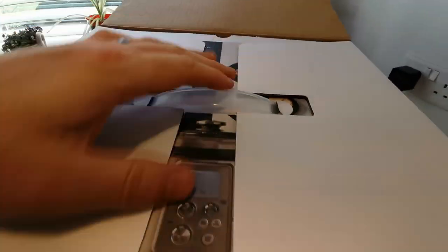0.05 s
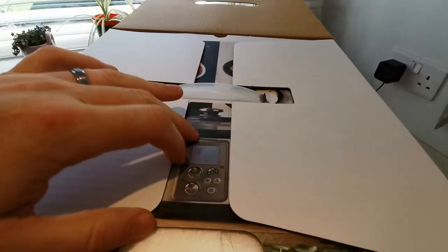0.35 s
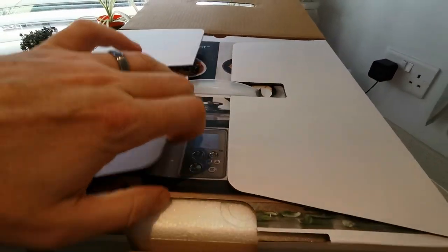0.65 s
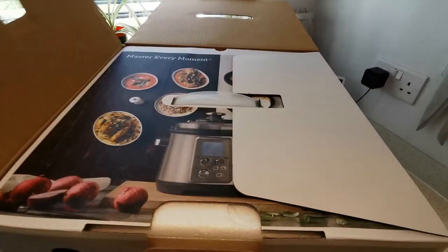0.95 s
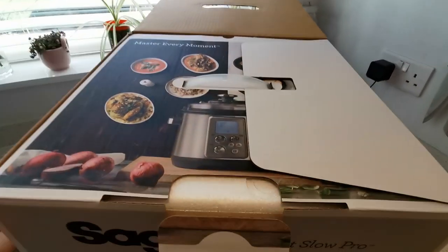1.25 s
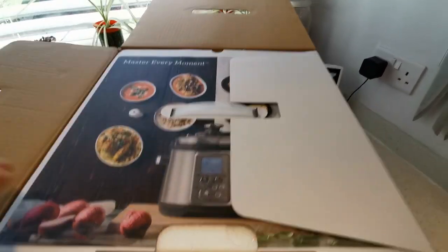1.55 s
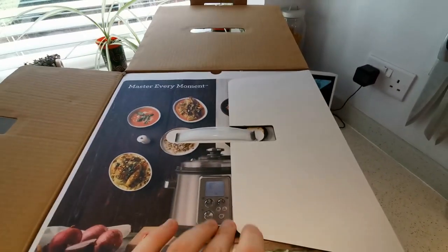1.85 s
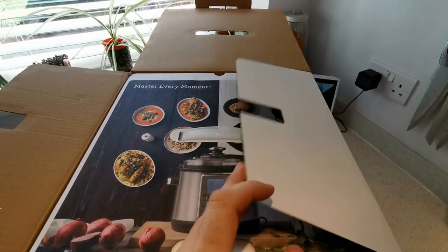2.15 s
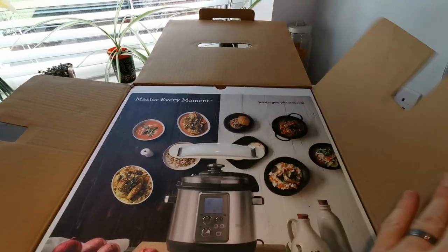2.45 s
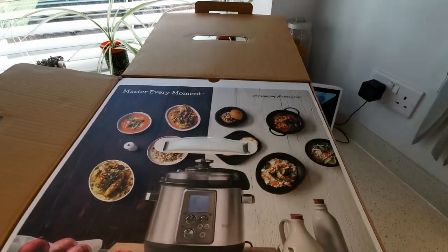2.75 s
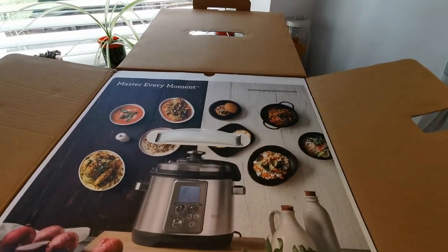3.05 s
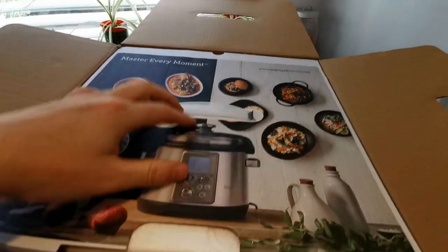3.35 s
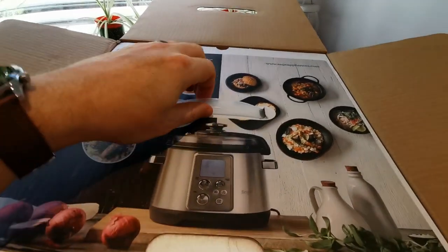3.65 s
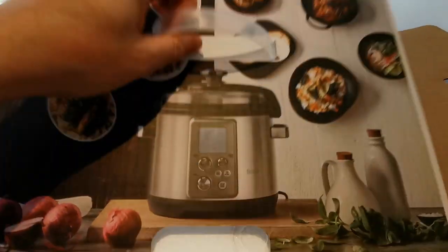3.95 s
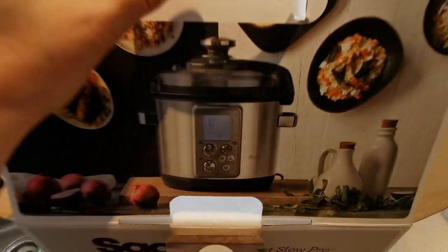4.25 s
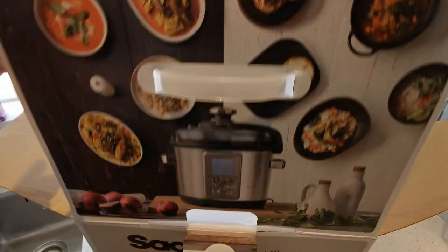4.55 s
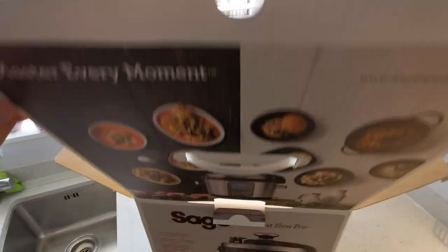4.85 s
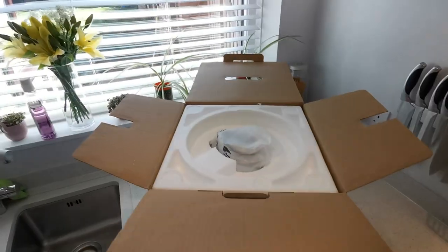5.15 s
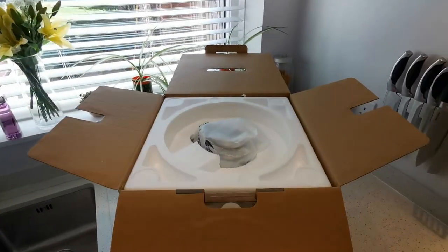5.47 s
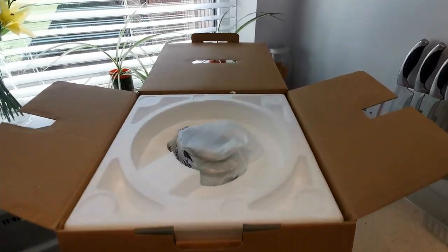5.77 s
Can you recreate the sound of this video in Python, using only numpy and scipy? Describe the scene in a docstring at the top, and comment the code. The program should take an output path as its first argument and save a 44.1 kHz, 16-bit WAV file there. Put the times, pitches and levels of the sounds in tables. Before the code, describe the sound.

A large cardboard box is opened close to the microphone in a small kitchen. A brush of a hand and a cluster of hollow knocks start it off, then hands hiss over the card while flaps scrape and snap. More knocks lead to a short groan as the tight lid slips free, followed by a loud thump and a puff of air. Finally the lid swishes down and lands. An appliance hums faintly.

```python
"""A brush of a hand, then a cluster of hollow knocks: a large cardboard box is being opened.
It stands on a kitchen worktop, close to a handheld stereo microphone. Hands hiss over the card,
flaps snap and scrape, and the tight lid sticks and slips free with a groan, fanning air at the
microphone. At the end the lid swishes down and lands. The small room answers; an appliance hums."""
import sys
import numpy as np
from scipy import signal
from scipy.fft import rfft, irfft, next_fast_len
from scipy.io import wavfile
from scipy.ndimage import uniform_filter1d, map_coordinates

SR = 44100
rng = np.random.default_rng(int(sys.argv[2]) if len(sys.argv) > 2 else 0)


def store_wav(level_fs):
    """Save 16-bit WAV to argv[1]."""
    pcm = np.round(np.clip(np.atleast_2d(level_fs), -1, 1) * 32767)
    wavfile.write(sys.argv[1], SR, pcm.T.astype(np.int16))


N = 265041

# Levels are relative within a table; a positive balance leans left.
# appliance hum: f/Hz, level/dB
HUM_PARTIALS = [(61.7, -48.5), (123.4, -75), (246.8, -69)]
# noise of the quiet kitchen: f/Hz, level/dB
ROOM_TONE = [(20, -4), (45, 9), (90, -7.5), (160, -1), (260, -7), (600, -21.5), (2000, -24.5), (4000, -33),
             (11000, -31.5), (16000, -52)]
# reverberation of the kitchen: f/Hz, t60/s
ROOM_DECAY = [(100, 0.039), (300, 0.44), (1000, 0.25), (3000, 0.27), (8000, 0.3), (16000, 0.15)]
# likeness of the sound at the microphone's two ports: f/Hz, correlation
PORT_LIKENESS = [(100, 0.87), (300, 0.92), (700, 0.49), (1500, 0), (4000, 0)]
# unequal sensitivity of the ports: f/Hz, balance/dB
PORT_BALANCE = [(100, -3.5), (400, 2.5), (750, 3.5), (1300, -4), (2600, 3), (4500, 0), (6000, -2.5),
                (7200, -15), (8600, 20.5), (10500, 15.5), (13500, 10), (16000, 13.5)]
# air fanned by the lid: peak t/s, level/dB, half length/s
AIR_PUFFS = [(4.133, -47.5, 0.2), (4.461, -28.5, 0.033), (4.721, -44, 0.04), (5.66, -54.5, 0.06),
             (5.986, -50, 0.11)]
# resonances that the card lends to scrapes and cracks: f/Hz, width/Hz, gain/dB
CARD_RESONANCES = [(254, 19, -2.5), (385, 29, 5.5), (710, 33, -0.5), (862, 26, -4), (973, 17.65, -4.5),
                   (1348, 35, -2.5), (1720, 47, 1.5), (1990, 39, 3), (2220, 68, 3.5), (2560, 270, 2.5),
                   (2930, 120, 2.5), (4190, 250, -0.5)]
# spectra of rubbed and struck card: f/Hz, level/dB
PANEL_RUMBLE = [(70, -23.5), (160, -6.5), (250, 1.5), (340, -5), (500, -8), (760, -1.5), (1000, -11),
                (1600, -31.5)]
FIBRE_RASP = [(500, -8.5), (1000, -2), (1400, 1), (2200, -0.5), (3300, -8.5), (4800, -3.5), (7000, -20),
              (12000, -47)]
HAND_HISS = [(2500, -18), (5000, -6.5), (6900, 3), (7800, -2.5), (9000, 2), (10800, 3), (13000, -3),
             (14200, -5), (15800, 0)]
SKIN_SIZZLE = [(5000, -48.5), (8000, -25), (10500, 2.5), (12500, 3), (14000, 7.5), (15800, -2)]
LID_SWISH = [(150, -3.5), (600, -1.5), (950, -5.5), (1500, -3), (3000, -5.5), (7000, -1.5), (11000, 2.5),
             (16000, 0)]
EDGE_SNAP = [(500, -20.5), (3000, -23), (5000, -6.5), (7000, 1.5), (10000, 0.5), (13000, -3),
             (16000, -15.5)]
CONTACT_CRACK = [(500, -33), (1200, 4), (2100, 3.5), (3200, -5.5), (4800, -2), (7000, -7.5), (11000, -12.5),
                 (16000, -41)]
# a hand glides over the print: t/s, length/s, level/dB, sizzle against hiss/dB, balance/dB
HAND_STROKES = [(-0.02, 0.025, -40.5, -6.5, 4.5), (0.16, 0.23, -43, -5, 7.5), (0.454, 0.069, -45.5, -6, 7),
                (0.67, 0.06, -48.5, -16.5, -1), (0.843, 0.23, -50, -7.5, 0.5),
                (1.106, 0.09, -41.5, 1, -0.5), (1.204, 0.18, -47.5, -8, 1), (1.28, 0.089, -45.5, 0, 0),
                (1.436, 0.1, -44.5, -5.5, 1), (1.794, 0.089, -56.5, -6, -5), (1.947, 0.2, -57, -10, -6),
                (2.217, 0.07, -48.5, -19, -5), (2.332, 0.09, -60, -20, -6), (2.413, 0.13, -45, -3, -1),
                (2.564, 0.092, -48.5, -3, -6), (2.642, 0.047, -44, 5.5, -12),
                (2.684, 0.14, -42, -3.5, -7.5), (2.766, 0.17, -39, -11.5, -6.5),
                (2.928, 0.033, -36.5, -13.5, -6), (3.331, 0.08, -49, -6.5, -1), (3.404, 0.26, -44, 2, -1.5),
                (4.042, 0.14, -50.5, -3, 3.5), (4.23, 0.46, -51, -3.5, 2.5), (4.528, 0.029, -41.5, 0, 0.5),
                (4.605, 0.055, -43, -6.5, 1.5), (4.739, 0.23, -48.5, -14, -1),
                (5.432, 0.07, -43.5, 4.5, -1)]
# card drags along card: t/s, length/s, rasp/dB, rumble/dB
CARD_SCRAPES = [(0.148, 0.048, -39, -38), (0.23, 0.13, -50, -50.5), (0.373, 0.032, -45.5, -44.5),
                (0.474, 0.058, -48.5, -51.5), (0.574, 0.43, -54.5, -54.5), (0.72, 0.14, -46.5, -59),
                (0.873, 0.19, -66.5, -59.5), (1.317, 0.072, -56.5, -55), (1.497, 0.037, -52, -82),
                (1.795, 0.17, -65, -60), (2.085, 0.2, -61.5, -59.5), (2.33, 0.1, -69.5, -61),
                (2.457, 0.051, -51, -51.5), (2.794, 0.12, -61, -61), (3.42, 0.12, -61, -48.5),
                (3.605, 0.26, -54.5, -44), (3.825, 0.08, -47, -40), (3.896, 0.029, -35, -58),
                (3.983, 0.1, -56.5, -42), (4.277, 0.027, -46, -48), (4.388, 0.055, -54.5, -41),
                (4.438, 0.039, -33, -30.5), (4.53, 0.1, -51.5, -53), (4.709, 0.055, -52.5, -52),
                (4.785, 0.27, -59, -65), (5.073, 0.11, -59.5, -54.5), (5.173, 0.2, -68.5, -66.5),
                (5.425, 0.07, -68, -57.5), (5.53, 0.2, -72.5, -59), (5.75, 0.32, -69, -55.5),
                (5.919, 0.011, -40, -41.5)]
# the lid slides down: t/s, level/dB, resonance f/Hz
LID_SLIDE = [(5.671, -55.5, 2360), (5.686, -33, 2590), (5.74, -33.5, 2840), (5.79, -36.5, 2360),
             (5.84, -40, 1575), (5.88, -43, 1360), (5.92, -47, 1220)]
# the tight lid slips: t/s, level/dB, slip rate/Hz
LID_JUDDER = [(3.88, -53, 354), (3.905, -32, 418), (3.93, -30, 387), (3.942, -19, 394), (3.952, -23, 417),
              (3.97, -43, 410), (3.99, -70, 360)]
# card edges snap past each other, and at 1.802 and 5.439 s a fingertip lands on the card: t/s, level/dB,
# balance/dB before a common lean to the right
FLAP_FLICKS = [(0.1763, -20, -1), (0.769, -44, 12.5), (0.8509, -19.5, 7), (1.658, -56.5, -24),
               (1.802, -56, -1), (2.4935, -23, 1), (2.655, -47, 1), (2.972, -35, -8), (3.341, -45, 3),
               (3.6, -40.5, 17), (3.695, -43, 5), (3.768, -49, -3.5), (3.9039, -28.5, 13), (3.932, -26, 7),
               (4.146, -49, 17), (4.4661, -20, -2.5), (4.556, -37, 15), (4.716, -42.5, 3),
               (4.8128, -39, 1.5), (5.167, -51, -4), (5.439, -51, 0), (5.926, -34.5, -2.5),
               (5.947, -31, -12)]
# modes of the box, from deep thud to panels, and of the air inside: f/Hz, level/dB, t60/s
THUD_MODES = [(80.8, -12.5, 0.051), (117.3, 9, 0.14), (153.6, 10, 0.13)]
BODY_MODES = [(185, -6, 0.067), (232.6, -5.5, 0.11), (289.3, -3, 0.099), (334.3, -3, 0.099),
              (407.4, -5, 0.11)]
PANEL_MODES = [(528, -4, 0.036), (699, -3, 0.07), (761.4, 0.5, 0.086), (854, 0, 0.093), (941, -6, 0.12),
               (1032, -4.5, 0.064)]
CAVITY_MODES = [(247.8, 0, 0.33)]
# blows on the box, and at 3.904, 3.918 and 3.931 s the stick-slip jolts of the tight lid: t/s, strength/dB,
# hardness of the contact/dB, weight behind it/dB
BOX_BLOWS = [(0.129, -28.5, -16.5, -8), (0.139, -33, -11, -18), (0.148, -31.5, -8.5, -11),
             (0.175, -21.5, -2, -14), (0.327, -54, 9, -10), (0.512, -53.5, 3, 2), (0.665, -49.5, -7.5, -17),
             (0.851, -52, 8.5, 5), (1.169, -61, 5.5, -7), (1.36, -51, -10.5, -4), (1.846, -47, -18, -4.5),
             (1.876, -50, -9, -16), (2.246, -53, -6.5, -0.5), (2.492, -58.5, 11, -6.5),
             (3.3395, -33, -17.5, -3), (3.432, -35, -11, -4), (3.456, -35.5, -33, -18),
             (3.494, -33.5, -13, -3.5), (3.506, -38.5, -7, -12), (3.583, -40, -3, -9.5),
             (3.5998, -21.5, -7.5, -15.5), (3.697, -20, -14, -8), (3.766, -35, -1, -17),
             (3.819, -43, -3, -18), (3.904, -45.5, 14.5, -10), (3.918, -40, 10, 2),
             (3.931, -39.5, 7.5, 10.5), (4.024, -42, -1.5, 15.5), (4.04, -46, 11.5, 4),
             (4.128, -44.5, -4.5, -14), (4.146, -60.5, 8.5, -13), (4.448, -37.5, 1.5, -2),
             (4.468, -16, -6.5, -5.5), (4.716, -44.5, -10, -4), (5.073, -38, -12, -26),
             (5.092, -43, -8, -33), (5.926, -36, 3.5, -11), (5.947, -43.5, 0.5, -15)]


def amp(db):
    return 10 ** (np.asarray(db) / 20)


def unit(x):
    return x / np.sqrt(np.mean(x ** 2) + 1e-20)


def burst(x, seconds):
    """Scale a short sound to rms 1, its energy counted over so many seconds."""
    return x / np.sqrt(np.mean(np.sum(x ** 2, axis=-1)) / (seconds * SR))


def along(points, hz):
    """Interpolate (f/Hz, value) points on a log frequency axis."""
    point_hz, values = np.transpose(points)
    return np.interp(np.log(hz + 1), np.log(point_hz + 1), values)


def curves(rows):
    """One value per sample for each column after the time."""
    times, *columns = np.transpose(rows)
    return [np.interp(np.arange(N) / SR, times, column) for column in columns]


def during(rows):
    """1 from the first row's time to the last, else 0."""
    t = np.arange(N) / SR
    return (t > rows[0][0]) & (t < rows[-1][0])


def wobble(rate):
    """A smooth random curve, rate knots a second."""
    return map_coordinates(rng.standard_normal(int(N * rate / SR) + 4), [np.arange(N) * rate / SR])


def pan(db):
    """Left and right gains of constant power."""
    gains = amp([np.atleast_1d(db) / 2, -np.atleast_1d(db) / 2])
    return gains / np.sqrt(np.mean(gains ** 2, axis=0))


def filtered(x, response):
    """Weight the spectrum of x by a function of frequency."""
    n = x.shape[-1]
    size = next_fast_len(n + SR // 10)
    return irfft(rfft(x, size) * response(np.fft.rfftfreq(size, 1 / SR)), size)[..., :n]


def coloured(x, spectrum, size=2048):
    """Minimum-phase colour: nothing sounds before its cause."""
    cepstrum = irfft(np.log(amp(along(spectrum, np.fft.rfftfreq(size, 1 / SR)))))
    cepstrum[1:size // 2] *= 2
    cepstrum[size // 2 + 1:] = 0
    impulse = irfft(np.exp(rfft(cepstrum)))
    return signal.fftconvolve(x, impulse[None], axes=1)[:, :x.shape[-1]]


def spread(pair):
    """Two unrelated signals become left and right, alike in the bass."""
    turn = lambda hz: np.arccos(np.clip(along(PORT_LIKENESS, hz), -1, 1)) / 2
    mid, side = filtered(pair, lambda hz: np.array([np.cos(turn(hz)), np.sin(turn(hz))]))
    return np.array([mid + side, mid - side])


def noise(n):
    return spread(rng.standard_normal((2, n)))


def add(track, start_s, sound):
    part = track[:, round(start_s * SR):][:, :sound.shape[-1]]
    part += sound[..., :part.shape[-1]]


def kitchen_background():
    """A low appliance hum, a little to the right, over faint room tone."""
    wavering_t = np.arange(N) / SR + 0.00051 * wobble(2.55)
    hum = sum(amp(db) * unit(np.sin(2 * np.pi * hz * wavering_t)) for hz, db in HUM_PARTIALS)
    return hum * pan(-2.8) + amp(-58.5) * unit(coloured(noise(N), ROOM_TONE))


def kitchen_reverb(x):
    """The near walls answer after 5 ms; each frequency dies at its own speed."""
    hz, t, bands = signal.stft(noise(SR // 2), SR, nperseg=256)
    tail = signal.istft(bands * amp(-60 * t / along(ROOM_DECAY, hz)[:, None]), SR, nperseg=256)[1]
    tail = np.pad(tail / np.linalg.norm(tail[0]), ((0, 0), (SR // 200, 0)))
    return signal.fftconvolve(x, tail, axes=1)[:, :N]


def lid_draught():
    """At close range, each swing of the broad lid fans a puff of air over the microphone."""
    t = np.arange(N) / SR
    flow = sum(amp(db) * np.exp(-((t - peak_s) / half_s) ** 2) for peak_s, db, half_s in AIR_PUFFS)
    buffeting = coloured(noise(N), [(20, -10), (45, -1), (85, -1), (130, -14), (300, -38.5)])
    return flow * unit(buffeting)


def through_card(x):
    """Sound that comes by way of the card takes on its resonances."""
    hz = np.geomspace(100, 6000, num=400)
    gain_db = sum(db / (1 + (2 * (hz - centre) / width) ** 2) for centre, width, db in CARD_RESONANCES)
    return coloured(x, np.transpose([hz, gain_db]))


def friction(spectrum, rough_db, rough_hz, catches_per_s, catch_db):
    """Countless tiny slips under an uneven pressure, with now and then a fibre that catches."""
    pressure = amp(rough_db * wobble(rough_hz))
    caught = rng.random(N) < catches_per_s / SR
    catches = caught * amp(2.4 * rng.exponential(size=N).clip(0, 3)) * rng.standard_normal((2, N))
    slips = noise(N) * pressure + amp(catch_db) * unit(spread(catches))
    return unit(through_card(coloured(slips, spectrum)))


def patchy(x, depth_db):
    """As the contact travels over the card, its resonances come and go."""
    bands = signal.stft(x, nperseg=1024)[2]
    patches = uniform_filter1d(rng.standard_normal(bands.shape[1:]), size=4, axis=0)
    patches = uniform_filter1d(patches, size=6, axis=1)
    return unit(signal.istft(bands * amp(depth_db * unit(patches)), nperseg=1024)[1][:, :N])


def rubbing_textures():
    """The sounds of rubbed card: panel rumble, fibre rasp, smooth hiss and the sizzle of dry skin."""
    rumble = friction(PANEL_RUMBLE, rough_db=1.5, rough_hz=60, catches_per_s=120, catch_db=-10.5)
    rumble = patchy(rumble, depth_db=3)
    rasp = friction(FIBRE_RASP, rough_db=1.2, rough_hz=90, catches_per_s=170, catch_db=-9)
    rasp = patchy(rasp, depth_db=2.5)
    hiss = friction(HAND_HISS, rough_db=1.6, rough_hz=87, catches_per_s=1300, catch_db=-11)
    hiss = patchy(hiss, depth_db=3.5)
    sizzle = friction(SKIN_SIZZLE, rough_db=4, rough_hz=49, catches_per_s=1500, catch_db=-13)
    return rumble, rasp, hiss, sizzle


def gestures(starts, lengths, attack_s, fade_db_per_s):
    """One envelope per gesture, a point each millisecond: it gets up to speed, holds, then dies away."""
    t = np.arange(0, N / SR, 0.001) - starts[:, None]
    return np.clip(t / attack_s, 0, 1) * amp(-fade_db_per_s * np.maximum(t - lengths[:, None], 0))


def together(envelopes, gains):
    """The level of overlapping gestures at every sample: their powers add."""
    level = np.sqrt(gains ** 2 @ envelopes ** 2)
    return np.interp(np.arange(N), np.linspace(0, N, len(level)), level)


def rubbing():
    """Hands mostly hiss and sizzle, card on card mostly rasps and rumbles; both stir the same panels."""
    rumble, rasp, hiss, sizzle = rubbing_textures()
    start, length, hand_db, sizzle_db, side_db = np.transpose(HAND_STROKES)
    hand = gestures(start, length, attack_s=0.025, fade_db_per_s=319.5)
    start, length, rasp_db, rumble_db = np.transpose(CARD_SCRAPES)
    card = gestures(start, length, attack_s=0.018, fade_db_per_s=215.5)
    glide, drag = together(hand, amp(hand_db)), together(card, amp(rasp_db))
    skin = pan(side_db) * amp(hand_db) / np.hypot(1, amp(sizzle_db))  # dry skin trades hiss for sizzle
    return (rumble * np.hypot(together(card, amp(rumble_db)), amp(-19) * glide)
            + rasp * np.hypot(drag, amp(-13.5) * glide)
            + hiss * np.hypot([together(hand, side) for side in skin], amp(-2) * drag)
            + sizzle * np.array([together(hand, side * amp(sizzle_db)) for side in skin]))


def lid_slide():
    """The lid swishes down; as it slows, its resonance sinks and the treble goes."""
    db, centre_hz = curves(LID_SLIDE)
    scrape = friction(LID_SWISH, rough_db=0.9, rough_hz=140, catches_per_s=340, catch_db=-15.5)
    hz, t, bands = signal.stft(patchy(scrape, depth_db=3), SR, nperseg=512)
    ratio = (hz[:, None] + 1) / np.interp(t * SR, np.arange(N), centre_hz)
    resonance = 1 + 1.3 * np.exp(-(np.log2(ratio) / 0.66) ** 2)
    gain = resonance / (1 + (ratio / 4) ** 3)
    swish = signal.istft(bands * gain / np.sqrt(np.mean(gain ** 2, axis=0)), SR, nperseg=512)[1][:, :N]
    return during(LID_SLIDE) * amp(db - 2.5) * unit(swish) * pan(-0.5)


def lid_judder():
    """The lid sticks and slips in quick succession as it is pulled out: a short groan."""
    db, slip_hz = curves(LID_JUDDER)
    phase = 2 * np.pi * np.cumsum(slip_hz * (1 + 0.0347 * wobble(180))) / SR
    groan = np.sin(phase) + amp(-11) * np.sin(2 * phase) + amp(-22) * np.sin(3 * phase)
    return during(LID_JUDDER) * amp(db + 1.4 * wobble(180)) * unit(groan) * pan(3)


def flap_flicks():
    """A card edge lets go, or a fingertip lands: one sharp snap, scattered by the flaps around it."""
    out, t = np.zeros((2, N)), np.arange(SR // 10) / SR
    envelope = amp(-60 * t / 0.00066) + amp(-21.5 - 60 * t / 0.075)
    for start_s, db, side_db in FLAP_FLICKS:
        pair = coloured(rng.standard_normal((2, len(t))) * envelope, EDGE_SNAP)
        snap = np.array([burst(side, 0.003) for side in pair])
        add(out, start_s, amp(db) * pan(side_db - 2.5) * snap)
    return out


def ring(modes, t, scatter_db, detune, skew_rad):
    """Damped modes; each place of contact stirs them differently and reaches the ports out of step."""
    hz, db, t60 = np.transpose(modes)[:, :, None]
    size, shift, phase = rng.standard_normal((3, len(modes), 1))
    polarity = (-1) ** np.arange(len(modes))[:, None]
    fade = polarity * amp(db + scatter_db * size - 60 * t / t60)
    angle = 2 * np.pi * hz * (1 + detune * shift) * t
    pair = np.array([np.sum(fade * np.sin(angle + side * skew_rad * phase), axis=0) for side in (1, -1)])
    return burst(pair * (1 - np.exp(-t / 0.00038)), 0.034)


def push(t, width_s):
    """Dead card is shoved in and springs back once: a single swing."""
    swing = (t - 1.175 * width_s) / (width_s / 2)
    return burst(np.array([swing, swing]) * np.exp(-swing ** 2), 0.013)


def box_knocks(hand_damps_s=0.6):
    """A blow shoves the box and rings it; weight adds a thud, a hard contact a panel clap and crack."""
    out, t = np.zeros((2, N)), np.arange(SR * 2 // 5) / SR
    contact = amp(-60 * t / 0.0082) + amp(-60 * t / 0.14)  # the contact, then nearby flaps chatter
    for start_s, db, hard_db, weight_db in BOX_BLOWS:
        thud = amp(db + weight_db - 3.5) * ring(THUD_MODES, t, scatter_db=1.5, detune=0.11, skew_rad=0.05)
        softness = np.clip((weight_db - hard_db + 10) / 24, 0, 1)  # a soft, deep blow stays longer
        shove = amp(db - 5) * push(t, width_s=0.0016 + 0.0013 * softness)
        body = amp(db - 5.5) * ring(BODY_MODES, t, scatter_db=4, detune=0.026, skew_rad=0.2)
        # the hollow air note rings on the first knocks, until a resting hand damps it
        undamped = start_s < hand_damps_s
        air = undamped * amp(db - 4) * ring(CAVITY_MODES, t, scatter_db=0, detune=0.0036, skew_rad=0)
        clap = amp(db + hard_db - 1.5) * ring(PANEL_MODES, t, scatter_db=6.5, detune=0.017, skew_rad=0.52)
        chatter = through_card(coloured(noise(len(t)) * contact, CONTACT_CRACK))
        crack = amp(db + 1.164 * hard_db - 4) * burst(chatter, 0.024)
        add(out, start_s, thud + shove + body - air + clap + crack)
    return out


def scene():
    """The box close up on the worktop, the kitchen well behind it."""
    blows = box_knocks() + lid_judder()
    handling = flap_flicks() + rubbing() + lid_slide()
    reverb = kitchen_reverb(amp(-11) * blows + amp(-10.5) * handling)
    return blows + handling + reverb + lid_draught() + kitchen_background()


def record(dry):
    """The microphone's two ports colour the sound differently; a loud peak briefly ducks the gain."""
    threshold, recovery_db_per_s, lag_s, top_hz = 0.4, 16, 0.018, 16050
    x = filtered(dry, lambda hz: pan(along(PORT_BALANCE, hz)))
    over_db = np.clip(20 * np.log10(np.abs(x).max(axis=0) / threshold + 1e-9), 0, 6)
    recovery_db = recovery_db_per_s * np.arange(N) / SR
    duck_db = np.maximum.accumulate(over_db + recovery_db) - recovery_db
    pole = np.exp(-1 / (lag_s * SR))  # the gain falls too late to catch the peak itself
    gain = amp(-signal.lfilter([1 - pole], [1, -pole], duck_db))
    return filtered(x * gain, lambda hz: hz < top_hz)


dry = scene()
out = record(dry)
store_wav(out)
```